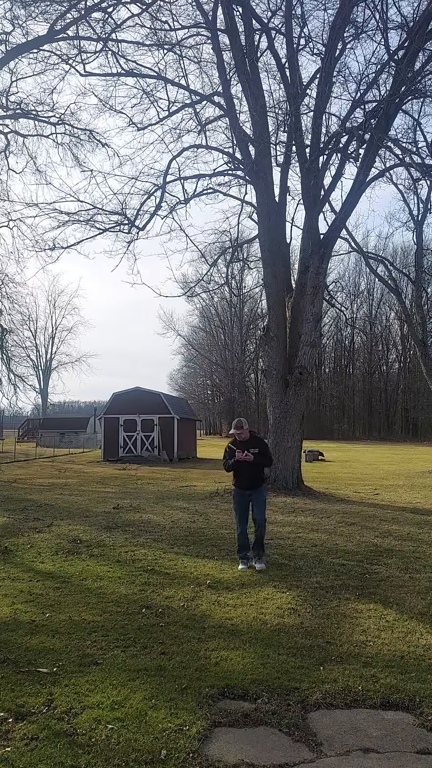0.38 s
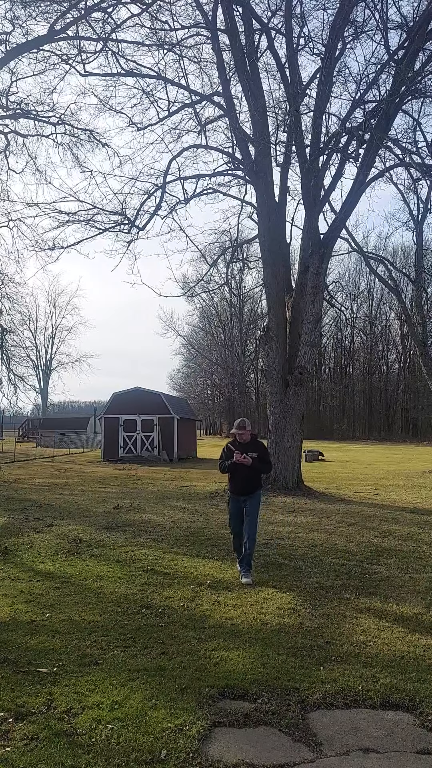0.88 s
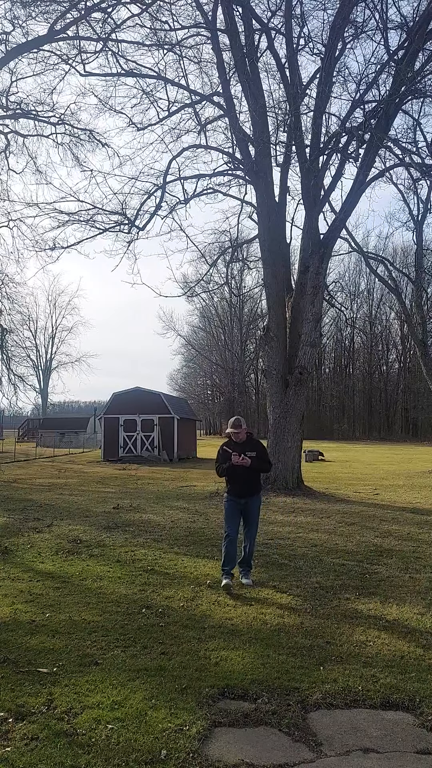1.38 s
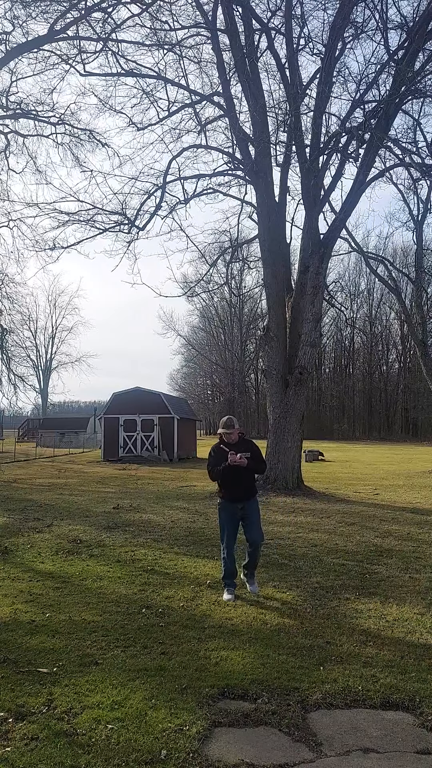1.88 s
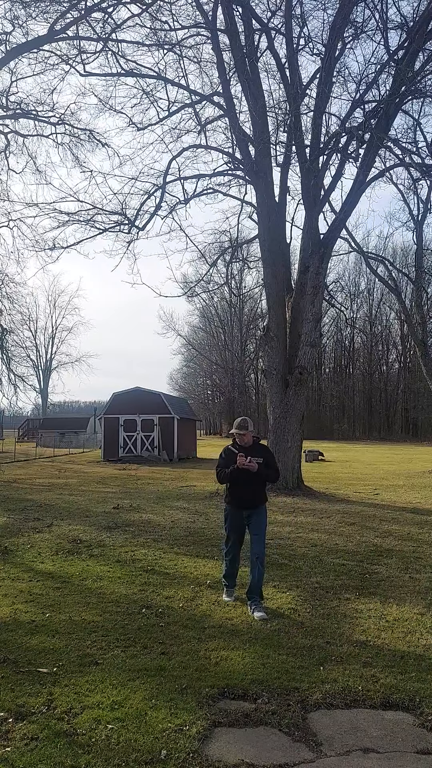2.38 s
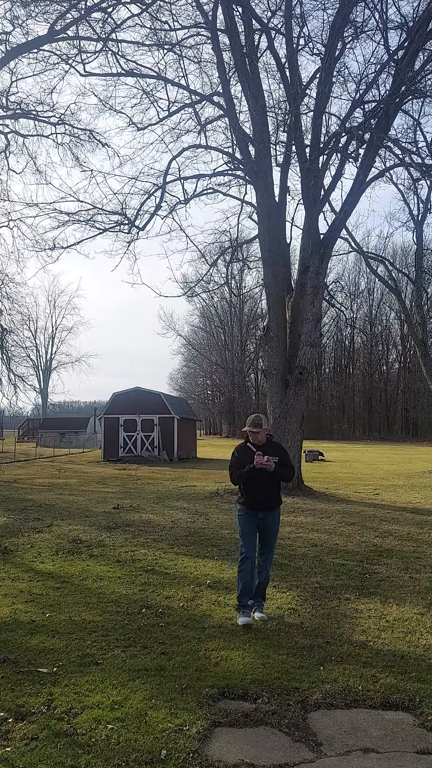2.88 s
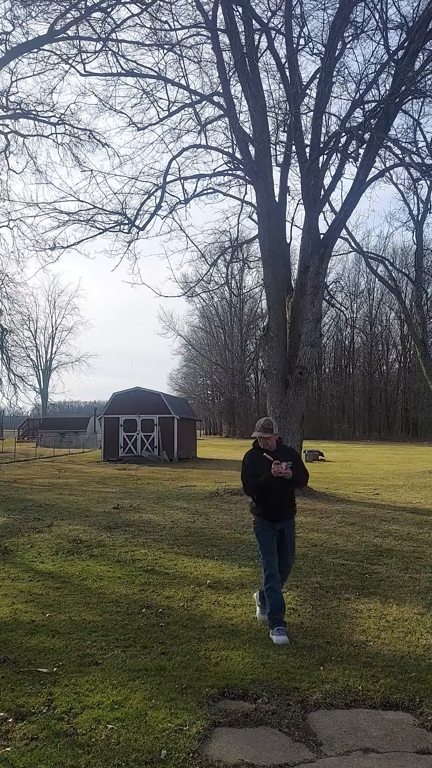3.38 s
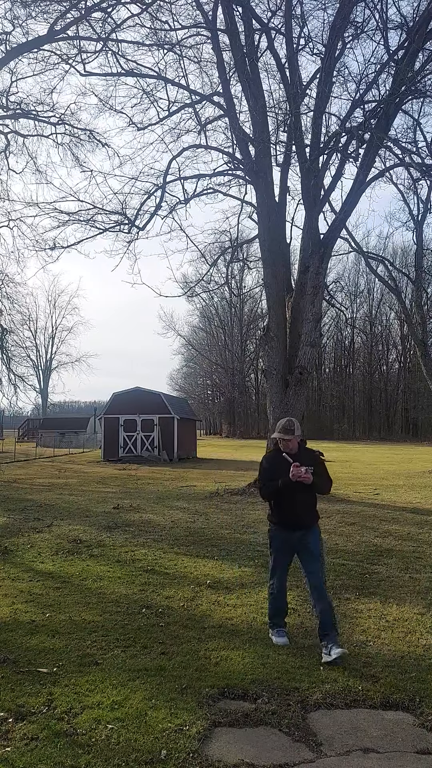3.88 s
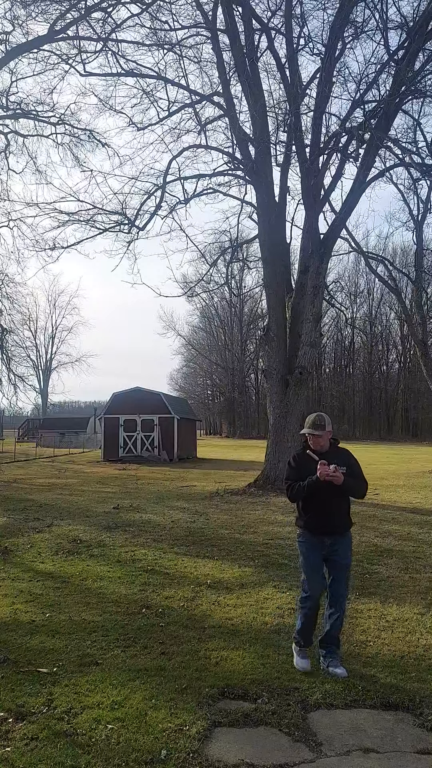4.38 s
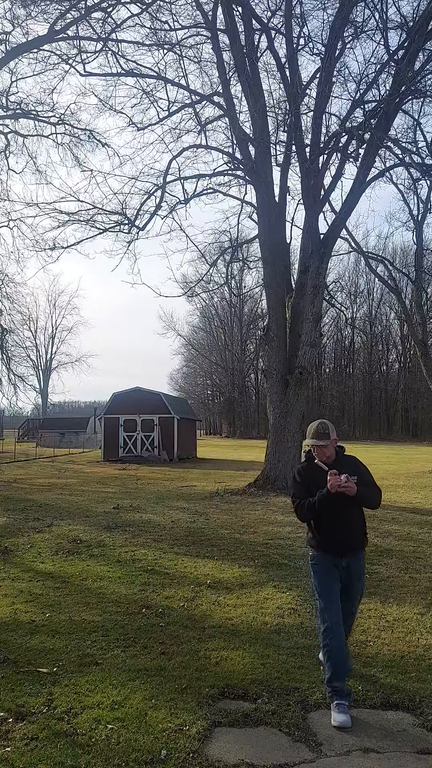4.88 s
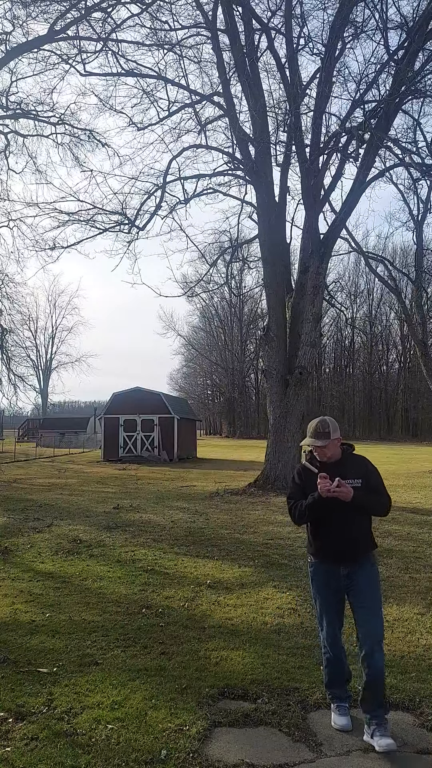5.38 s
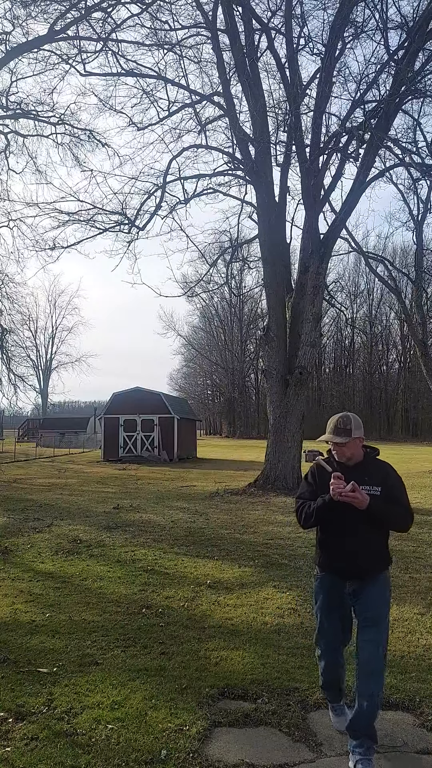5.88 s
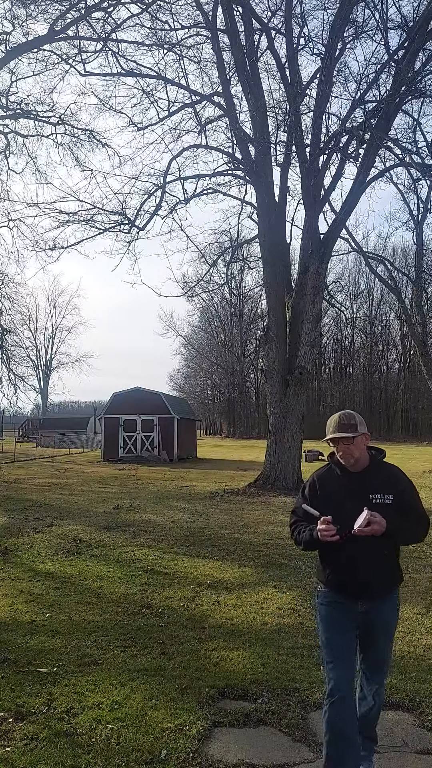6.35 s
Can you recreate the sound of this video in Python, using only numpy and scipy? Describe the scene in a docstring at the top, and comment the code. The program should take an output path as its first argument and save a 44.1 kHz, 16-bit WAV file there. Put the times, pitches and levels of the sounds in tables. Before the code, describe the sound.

A wooden striker scrapes a hand-held friction call in a steady run of short raspy turkey-like yelps, outdoors with light wind bumping the microphone.

```python
"""Friction call in an open yard

A wooden striker is scraped over a hand-held friction call in short strokes, modelled as trains of slips.
Most strokes squeak as the tip starts to slip; all break into an uneven rasp and many lock on a clean yelp.
The slips ring the plate and pot; trees and a shed return echoes and a scattered tail.
Shaped noise makes the hiss of the sliding tip, the wind on the microphone ports and a distant wash.
"""
import sys
import numpy as np
from scipy import signal
from scipy.fft import rfft, irfft
from scipy.io import wavfile
from scipy.ndimage import uniform_filter1d

SR = 44100
rng = np.random.default_rng(int(sys.argv[2]) if len(sys.argv) > 2 else 0)


def dump_mix(stems):
    """Bounce the given channels to the path in sys.argv[1] as a 16-bit WAV at rate SR."""
    frames = np.atleast_2d(stems).T  # one column per channel
    limited = np.clip(frames, -1, 1)  # hard clip at full scale
    pcm = np.round(limited * 32767).astype(np.int16)
    wavfile.write(sys.argv[1], SR, pcm)


def to_linear_factor(level_db):
    """Convert decibel levels (scalar or array-like) to linear amplitude factors."""
    exponent = np.asarray(level_db, float) / 20
    return 10 ** exponent


N = 286209  # length in samples

# Uneven slipping: (break [s], lift [s], level at full pressure [dB], brightness [dB per octave])
RASPS = [(-.17, -0.076, -19, 0.5), (0.201, 0.24, -19.5, -1.5), (0.349, 0.392, -16, 0.5),
         (0.616, 0.68, -18, 1.5), (0.859, 0.943, -20.5, -1), (1.16, 1.247, -21.5, 3.5),
         (1.474, 1.576, -17, 2), (1.764, 1.877, -17, 2.5), (2.102, 2.245, -19, 3), (2.449, 2.574, -19, 1.5),
         (2.792, 2.91, -17.5, 1), (3.133, 3.251, -16, 2), (3.443, 3.572, -14, 1),
         (3.809, 3.938, -17.5, -0.5), (4.191, 4.303, -16, 1), (4.559, 4.672, -15, 1.5),
         (4.839, 4.896, -16.5, 0.4), (5.038, 5.108, -8.5, 1.1), (5.278, 5.358, -1, 2.5),
         (5.576, 5.691, -14.5, 1.4), (5.922, 6.026, -16, 1.2)]
# Slip rates that the plate favours: (rate [Hz], share of the draws up to this step [0..1])
SLIP_STEPS = [(742, .55), (930, 1)]
# Slips locked to the ringing plate: (start [s], end [s], first rate [Hz], last rate [Hz], level [dB])
LOCKS = [(.238, 0.261, 772, 762, -19.5), (.375, 0.392, 753, 775, -14.5), (.67, 0.701, 756, 781, -23.5),
         (1.166, 1.236, 750.6, 746, -16.5), (1.52, 1.574, 783.6, 730, -19.5),
         (1.774, 1.846, 732.5, 720.8, -16.5), (1.868, 1.887, 742, 772, -14.5),
         (2.2, 2.234, 699, 798, -20.5), (2.515, 2.557, 720.5, 788, -17), (3.19, 3.237, 727.5, 770.5, -20.5),
         (3.457, 3.522, 762.7, 702.7, -15.5), (3.554, 3.584, 757, 784, -21),
         (4.196, 4.252, 726, 718.4, -19), (4.284, 4.308, 731, 789, -20.5), (4.645, 4.667, 734, 796, -13.5),
         (5.04, 5.099, 742, 727.4, -21), (5.279, 5.365, 737, 753, -17.5), (5.582, 5.646, 739, 729.6, -16),
         (5.665, 5.701, 739.5, 777, -16.5), (5.985, 6.012, 733, 727.7, -17.5)]
# Even slipping as the tip first bites: (touch [s], first rate [Hz], level [dB])
SQUEAKS = [(.555, 1151, -28.5), (.805, 1105, -31.5), (1.12, 1176, -25), (1.445, 1151, -29),
           (1.748, 1199, -28.5), (2.09, 1134, -28), (2.44, 1150, -31), (2.775, 1220, -31),
           (3.095, 1196, -28), (3.425, 1174, -31.5), (3.793, 1173, -32.5), (4.165, 1138, -26.5),
           (4.535, 1240, -24.5), (5.025, 1158, -24), (5.265, 1177, -20), (5.552, 1178, -23),
           (5.91, 1167, -21)]
# Ringing modes of plate and pot: (frequency [Hz], width [Hz], level over the broad response [dB])
POT_MODES = [(1266, 130, 14), (1520, 126, 12.5), (1741, 175, 13.5), (2133, 81, 15), (2612, 100, 19),
             (2764, 49, 14), (3534, 180, 6.5), (5130, 123, 13.5)]
# Broad response of plate and pot: (frequency [Hz], gain [dB])
POT_RESPONSE = [(300, -92.5), (740, -42.5), (940, -43.5), (1080, -25), (1400, -18), (2000, -20.5),
                (2380, -33.5), (3000, -32.5), (4300, -38.5), (6800, -37.5), (8800, -59), (12500, -56.5),
                (16000, -71)]
# Call at the two ports: (frequency [Hz], left minus right [dB])
CALL_BALANCE = [(1000, -3), (1500, 1), (2500, 5.5), (7400, 4), (9500, -4.5), (12500, -13.5)]
# Call at the two ports: (frequency [Hz], lead of the left [rad])
CALL_PHASE = [(1000, -.15), (1500, -.45), (2000, .7), (2200, 3.3), (2400, 4.7), (4400, 4.55), (12500, 2.1)]
# Single echoes off a trunk and the shed: (delay [s], level [dB])
ECHOES = [(.024, -13), (0.044, -20.5)]
# Scattered tail: (frequency [Hz], time to fall 60 dB [s])
YARD_DECAY = [(1500, 0.74), (5000, 0.55), (13000, 0.047)]
# Gusts on the ports, before the spread between channels: (time [s], level [dB])
GUSTS = [(0.0, -56), (.85, -57), (1.1, -45), (1.4, -51.5), (1.7, -45.5), (2.1, -61), (3.15, -52),
         (3.35, -42.5), (3.72, -64), (4.45, -64), (4.7, -51.5), (4.9, -61.5), (5.6, -56), (6.49, -64)]
# Spectrum of the buffeting: (frequency [Hz], relative density [dB])
BUFFET_SPECTRUM = [(30, -12), (70, 17.5), (110, -4), (200, -22), (600, -60.5)]
# Single eddies that thump the ports, before the spread between channels: (time [s], envelope peak [dB])
THUMPS = [(1.01, -29.5), (1.192, -29.5), (1.266, -37), (1.514, -33.5), (1.629, -36), (3.301, -32),
          (3.476, -38.5), (5.545, -42)]
# Flutter that swells and breaks off: (break [s], level at the break before smoothing [dB])
FLUTTERS = [(1.198, -32.5), (1.94, -40), (3.345, -41), (3.419, -36.5), (4.418, -43)]
# Spectrum of the flutter: (frequency [Hz], relative density [dB])
FLUTTER_SPECTRUM = [(150, -34), (330, 16.5), (650, 7), (1000, -32.5)]
# Spectrum of the distant wash: (frequency [Hz], relative density [dB])
WASH_SPECTRUM = [(120, -38), (250, -13), (420, -4), (600, -13.5), (1200, -16.5), (2500, -35.5),
                 (9300, -50.5), (13000, -45.5), (16000, -54.5)]
# Likeness of the wash in the two channels: (frequency [Hz], likeness [0..1])
WASH_SAME = [(100, 0.9), (500, 0.8), (3500, 1)]
# The tip sliding back: (start [s], end [s], level before the spread between channels [dB])
SLIDES = [(0.389, 0.498, -67.5), (1.344, 1.456, -63), (3.925, 4.076, -64.5)]
# Spectrum of the sliding hiss: (frequency [Hz], relative density [dB])
SLIDE_SPECTRUM = [(3000, -39), (6500, 0.5), (9000, -12), (13500, -2.5)]


def evened(x):
    """Scales to rms 1."""
    return x / np.sqrt(np.mean(x ** 2) + 1e-20)


def read(points, hz):
    """Reads a table over frequency on a log axis."""
    f, value = np.transpose(points)
    return np.interp(np.log(hz + 1), np.log(f + 1), value)


def add(mix, s, sound):
    """Mixes a sound in at time s."""
    part = mix[round(s * SR):][:len(sound)]
    part += sound[:len(part)]


def drift(count, hz):
    """Random wander slower than about hz, at rms 1."""
    low_pass = signal.butter(2, hz, fs=SR)
    wander = signal.lfilter(*low_pass, rng.standard_normal(count + 2000))
    return evened(wander[2000:])  # the filter has settled by then


def noise(spectrum, same, level_db, patchy_db):
    """Two channels of random short-time spectra with drifting patches; same is their likeness."""
    frames, hz = N // 128 + 5, np.fft.rfftfreq(512, 1 / SR)
    a, b, c, d, patches = rng.standard_normal((frames, 257, 5)).T
    patches = uniform_filter1d(patches, size=10, axis=1)  # over time
    patches = evened(uniform_filter1d(patches, size=4, axis=0))  # over frequency
    same = np.clip(same, -1, 1)
    left = a + 1j * b
    right = same * left + np.sqrt(1 - same ** 2) * (c + 1j * d)
    spectra = np.array([left, right]) * to_linear_factor(read(spectrum, hz)[:, None] + patchy_db * patches)
    sound = signal.istft(spectra, nperseg=512, noverlap=384)[1][:, :N]
    return to_linear_factor(level_db) * evened(sound)


def stroke_at(s):
    """The row of the stroke under way at time s."""
    return max(row for row in RASPS if row[0] <= s + 1e-6)


def pressure_db(t):
    """Tip pressure within the stroke at times t: starts light, bears down, holds and eases off to the lift."""
    t0, t1 = stroke_at(t[0])[:2]
    u = (t - t0) / (t1 - t0)
    start_db, bear_share = -4, 0.36  # shares of the stroke
    lift_db, ease_share = -7, 0.44
    bear_down = start_db * np.maximum(1 - u / bear_share, 0)
    ease_off = lift_db * np.maximum(1 - (1 - u) / ease_share, 0)
    return bear_down + ease_off


def pot(slips, press, tilt_db):
    """Causal ring of plate and pot, tilted in dB per octave; rms 1 before the pressure scales it."""
    hz = np.maximum(abs(np.fft.fftfreq(4096, 1 / SR)), 50)
    peaks = sum(to_linear_factor(2 * db) / (1 + (2 * (hz - f) / width) ** 2) for f, width, db in POT_MODES)
    broad = to_linear_factor(read(POT_RESPONSE, hz) + tilt_db * np.log2(hz / 1500))
    log_gain = np.log(broad * np.sqrt(1 + peaks))
    minimum_phase = np.exp(np.conj(signal.hilbert(log_gain)))
    ring = np.fft.ifft(minimum_phase).real[:2048]
    unpressed = signal.oaconvolve(slips, ring)[:len(slips)]
    return signal.oaconvolve(slips * press, ring) / np.std(unpressed)


def rasp(t0, t1, db, tilt_db):
    """Slips at a hopping rate and uneven gaps, strong and weak in turn, each with a puff of grit."""
    count = round((t1 - t0) * SR)
    t = np.linspace(t0, t1, count)

    rates, shares = np.transpose(SLIP_STEPS)
    hops_per_s = 45
    hops = np.cumsum(rng.random(count) < hops_per_s / SR)
    drawn_hz = rates[np.searchsorted(shares, rng.random(count))]
    slips_hz = uniform_filter1d(drawn_hz[hops], size=260)
    settle = .07 * np.exp(-(t - t0) / .02)  # the rate sinks to its step
    uneven = .015 * drift(count, 40) + .018 * drift(count, 500)
    turns = np.cumsum(slips_hz * (1 + settle + uneven)) / SR

    weak_db = -13  # every second slip
    slips = np.diff(np.floor(turns), prepend=0) * to_linear_factor(weak_db * (np.floor(turns) % 2))
    early = slips * np.clip(turns % 1 / np.gradient(turns), 0, 1)  # each slip falls between two samples
    slips = slips - early + np.roll(early, -1)
    puffs = signal.lfilter([1], [1, -.985], slips) * rng.standard_normal(count)
    grit = .065 * to_linear_factor(pressure_db(t)) * puffs

    # The longer a lock holds in all, the more it silences the rasp
    locked_s = sum((row[1] - row[0]) * (t > row[0]) * (t < row[1]) for row in LOCKS)
    hush_db_per_s = -210
    hush_db = hush_db_per_s * uniform_filter1d(locked_s, size=300)
    press = to_linear_factor(db + pressure_db(t) + hush_db) * signal.windows.tukey(count, .3)
    return pot(slips + grit, press, tilt_db)


def yard(x):
    """Direct sound and single echoes reach the port pair; a sparse tail comes from the trees."""
    # Tail: one random click in every 20 samples, its decay set by frequency
    taps = np.zeros((2, SR))
    at = np.arange(500, SR - 20, 20) + rng.integers(0, 20, (2, (SR - 501) // 20))
    np.put_along_axis(taps, at, rng.choice([-1., 1.], at.shape), 1)
    hz, t, z = signal.stft(taps, SR, nperseg=256)
    near = to_linear_factor(-60 * t / 0.071)
    far = to_linear_factor(-28.5 - 60 * t / read(YARD_DECAY, hz)[:, None])
    tail = signal.istft(z * (near + far), SR, nperseg=256)[1][:, :SR]
    tail *= to_linear_factor(-9.0) / np.linalg.norm(tail[0])

    hz = np.fft.rfftfreq(len(x), 1 / SR)
    echoes = sum(to_linear_factor(db) * np.exp(-2j * np.pi * hz * s) for s, db in ECHOES)
    echoes = echoes / (1 + (hz / 4000) ** 2)  # bark returns little treble
    port = to_linear_factor(read(CALL_BALANCE, hz) / 2) * np.exp(.5j * read(CALL_PHASE, hz))
    ports = np.array([port + echoes / port, 1 / port + echoes * port])  # echoes come from the other side
    direct = irfft(rfft(x) * ports, len(x))
    return direct + signal.fftconvolve(x[None], tail, axes=1)[:, :len(x)]


def wash():
    """Distant wash: steady, patchy noise, much alike in both channels."""
    same = read(WASH_SAME, np.fft.rfftfreq(512, 1 / SR))[:, None]
    return noise(WASH_SPECTRUM, same, level_db=-50.5, patchy_db=2.5)


def wind():
    """Lumpy buffeting and single thumps, mostly on the right port, and flutter higher up on the left."""
    t = np.arange(N) / SR
    same = .15
    gust_db = np.interp(t, *np.transpose(GUSTS))
    buffet_db = gust_db + 5.2 * drift(N, 23) + np.array([[-6], [5]])  # left, right
    buffet = noise(BUFFET_SPECTRUM, same, buffet_db, patchy_db=1.5)

    thump_hz, rise_s = 105, 0.0083  # each thump's pitch strays up to a fifth
    thumps, u = np.zeros(N), t[:SR // 10] / rise_s
    for (s, db), pitch in zip(THUMPS, rng.uniform(.8, 1.2, len(THUMPS))):
        swing = np.sin(2 * np.pi * thump_hz * pitch * rise_s * u)
        add(thumps, s, to_linear_factor(db) * u * np.exp(1 - u) * swing)

    swell_s = 0.098
    swell = sum(to_linear_factor(db) * np.exp(np.minimum(t - s, 0) / swell_s) * (t < s) for s, db in FLUTTERS)
    flutter_db = 3.2 * drift(N, 67) + np.array([[0], [-12]])
    flutter = noise(FLUTTER_SPECTRUM, same, flutter_db, patchy_db=3.5)
    flutter = uniform_filter1d(swell, size=200) * flutter
    return buffet + flutter + thumps * to_linear_factor(np.array([[-9], [5]]))


def even_slips(hz, sharp, rebound, waver, grit, count):
    """A steady train of slips, richer in overtones as they sharpen, with a little grit under the tip."""
    turns = np.cumsum(hz * (1 + waver * drift(len(hz), 300))) / SR + rng.random()
    train = sum(sharp ** k * np.cos(2 * np.pi * (k + 1) * turns) for k in range(count))
    octave = np.cos(4 * np.pi * turns)  # the tip rebounds once within each slip
    return train + rebound * octave + grit * sharp * rng.standard_normal(len(hz))


def lock(t0, t1, first_hz, last_hz, db):
    """A clean yelp: every second swing of the plate frees the tip, and the rate glides and wavers."""
    u = np.linspace(0, 1, round((t1 - t0) * SR))
    bearing_db = pressure_db(t0 + u * (t1 - t0))
    wobble_db = 2.5 * drift(len(u), 37)
    press = to_linear_factor(db + 0.5 * bearing_db + wobble_db) * signal.windows.tukey(len(u), .35)
    wander = .006 * drift(len(u), 40)
    hz = (first_hz + (last_hz - first_hz) * u) * (1 + wander)
    sharp = np.clip(0.81 + 0.079 * bearing_db * u, .3, .99)  # duller as the tip eases off
    slips = even_slips(hz, sharp, rebound=0, waver=0.0043, grit=.35, count=19)
    return pot(slips, press, tilt_db=stroke_at(t0)[-1] + 2.0)


def slides():
    """Dry hiss between or after grips, as wood glides back over the plate without gripping."""
    t = np.arange(N) / SR
    touch = sum(to_linear_factor(db) * (t > t0) * (t < t1) for t0, t1, db in SLIDES)
    touch = uniform_filter1d(touch, size=1200)
    level_db = 2.5 * drift(N, 60) + np.array([[-4], [2]])  # left, right
    return touch * noise(SLIDE_SPECTRUM, .6, level_db, patchy_db=3.5)


def squeak(t0, hz, db):
    """The slip rate sags to a lower step and the slips sharpen and roughen while the tip digs in."""
    lingers_s = 0.019  # past the break into rasping
    t1 = min(row[0] for row in RASPS if row[0] > t0) + lingers_s
    u = np.linspace(0, 1, round((t1 - t0) * SR))
    press = to_linear_factor(db + 1.97 * drift(len(u), 62)) * signal.windows.tukey(len(u), .3)
    left_s = (1 - u) * (t1 - t0)
    sag = .06 * u + 0.1327 / (1 + np.exp((left_s - .018) / 0.0057))  # creeps, then steps down at the break
    slips = even_slips(hz * (1 - sag), sharp=.1 + .72 * u ** 2, rebound=0.43 * u ** 3,
                       waver=0.011 + 0.021 * u ** 2, grit=0.11, count=12)
    return pot(slips, press, tilt_db=10.5)


def scene():
    """The call in the yard (begun a little early, so a stroke already rings), wind and distant wash."""
    lead_s = .5
    lead = round(lead_s * SR)
    call = np.zeros(N + lead)
    for table, stroke in ((SQUEAKS, squeak), (RASPS, rasp), (LOCKS, lock)):
        for row in table:
            add(call, row[0] + lead_s, stroke(*row))
    return yard(call)[:, lead:] + slides() + wind() + wash()


def top_cut(x):
    """Nothing passes above the cut-off."""
    return signal.sosfilt(signal.butter(12, 16300, fs=SR, output="sos"), x)


def record(dry):
    """The microphone rolls off the deepest bass, below 50 Hz."""
    bass_cut = signal.butter(2, 50, "high", fs=SR)
    mix = signal.lfilter(*bass_cut, dry)
    return top_cut(mix)


dry = scene()
out = record(dry)
dump_mix(out)
```